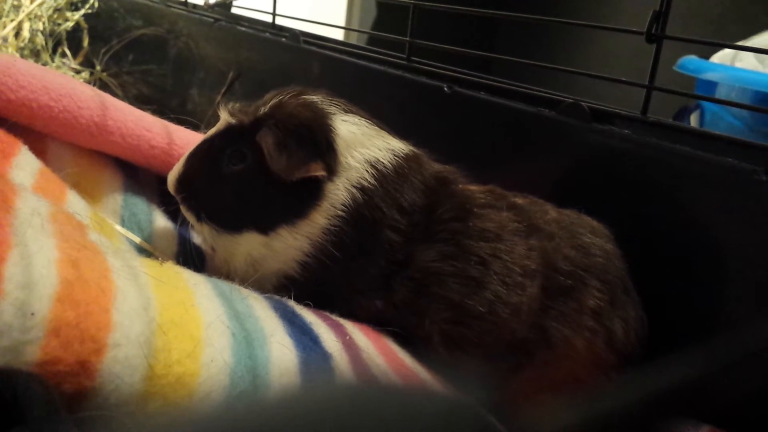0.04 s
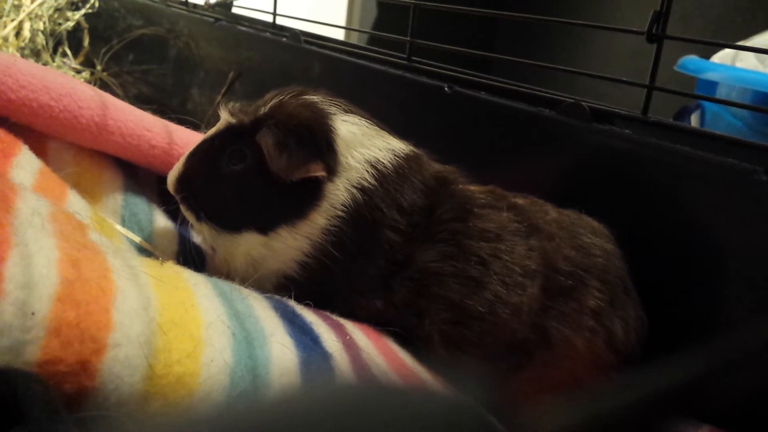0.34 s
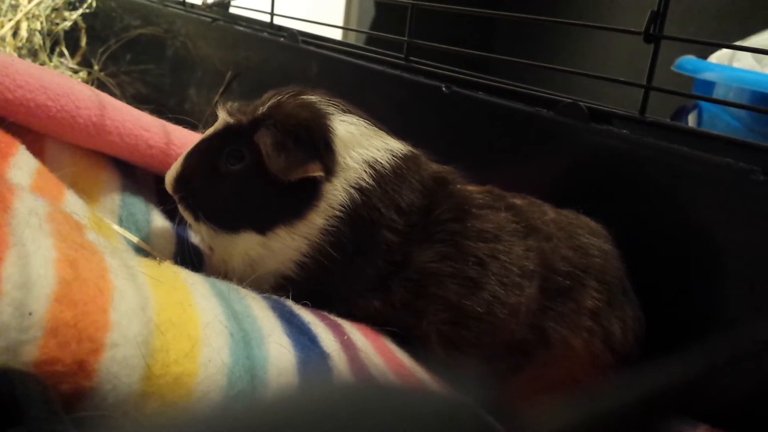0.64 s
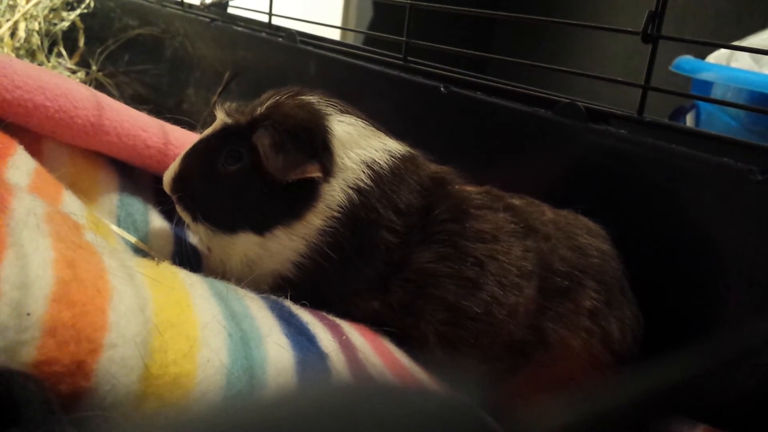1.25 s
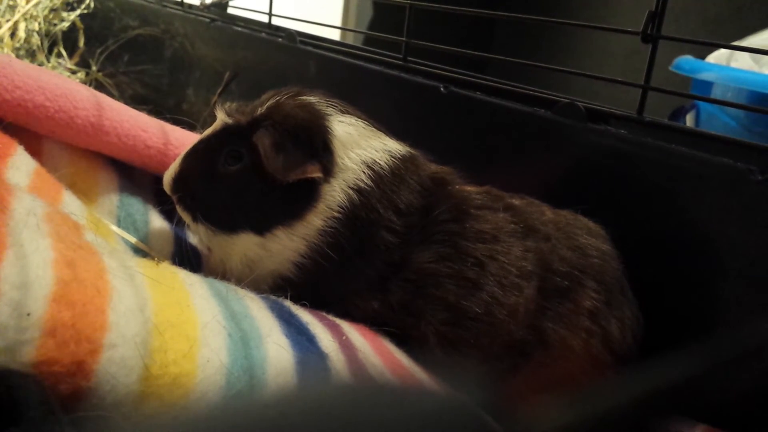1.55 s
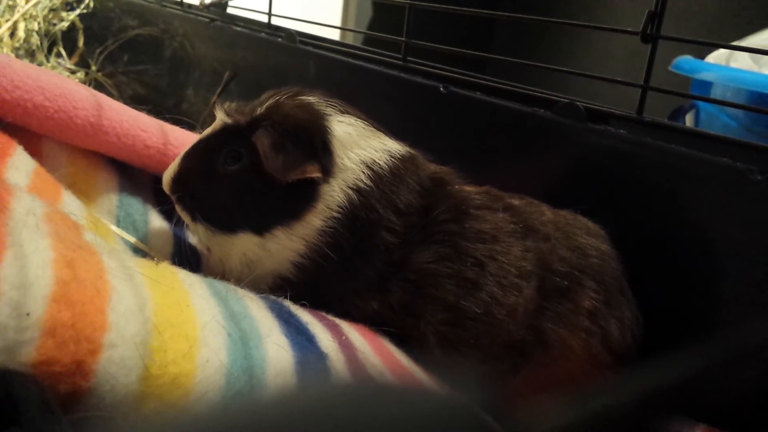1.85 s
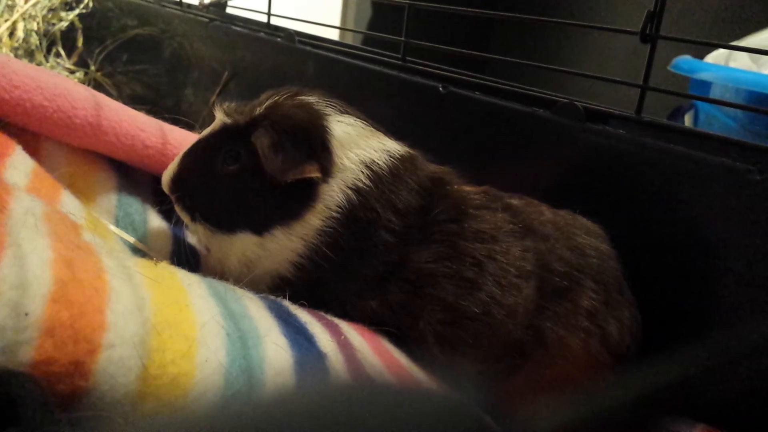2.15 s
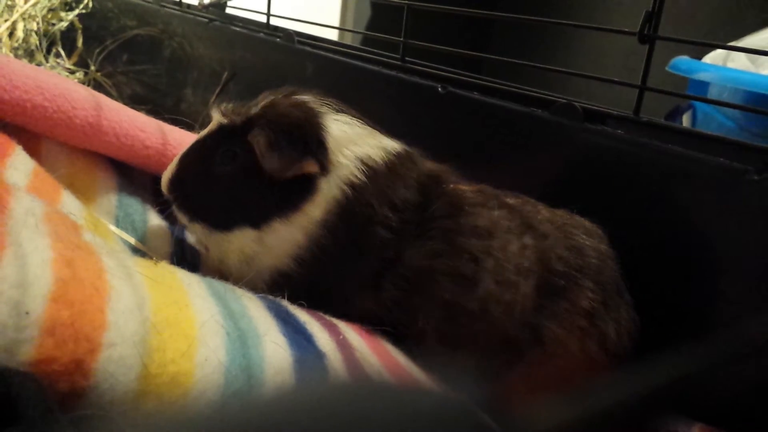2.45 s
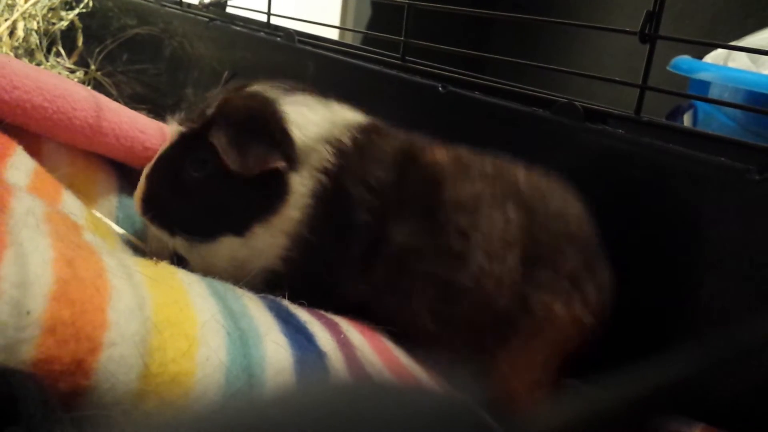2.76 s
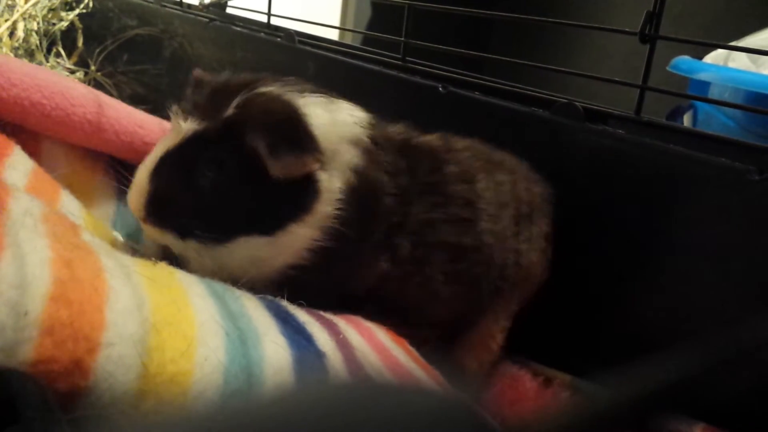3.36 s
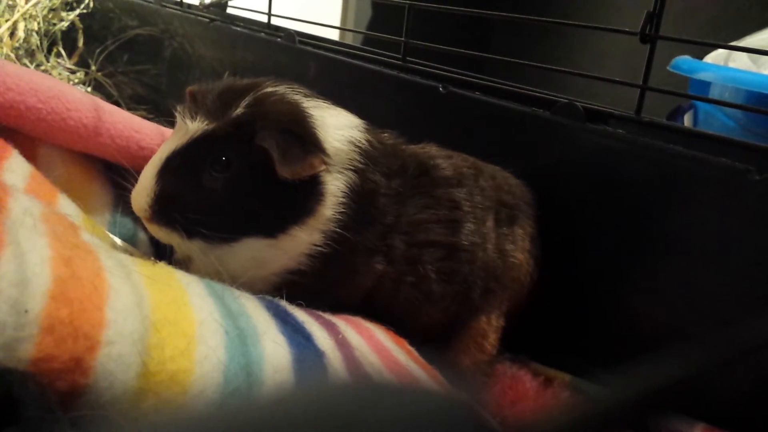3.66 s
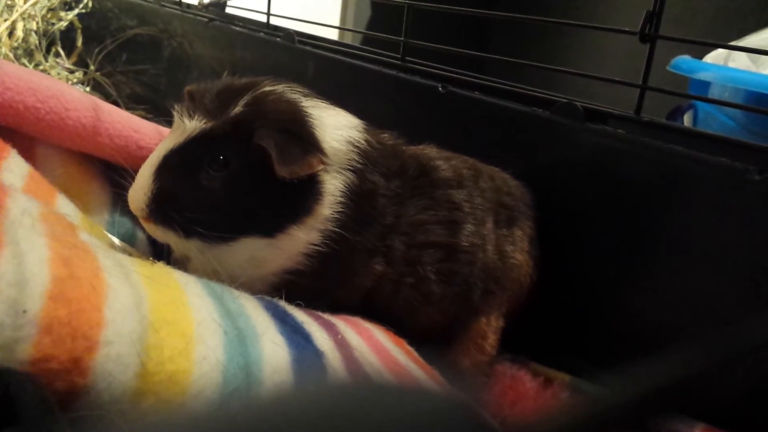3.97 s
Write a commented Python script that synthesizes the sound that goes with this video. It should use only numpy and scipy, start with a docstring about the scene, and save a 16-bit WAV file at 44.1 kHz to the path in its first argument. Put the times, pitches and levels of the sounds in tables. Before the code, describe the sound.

A guinea pig squeaks and chirps, hopping with soft thumps in its cage.

```python
"""Guinea pig in its cage

Close on a cage in a quiet room, a faint hum behind. A guinea pig noses softly in its bedding, gives
one falling squeak that breaks up hoarsely, then hops forward twice with a short chirp. Its feet thump
the plastic tray while fleece and hay rustle and tick. The stereo mic's right port rings in the treble."""
import sys
import numpy as np
from scipy import signal
from scipy.fft import rfft, irfft, next_fast_len
from scipy.io import wavfile
from scipy.ndimage import map_coordinates

SR = 44100
rng = np.random.default_rng(int(sys.argv[2]) if len(sys.argv) > 2 else 0)


def wav_out(sig):
    """Save sig, one row per channel (or a flat mono array), as 16-bit PCM at SR to the path in sys.argv[1]."""
    wavfile.write(sys.argv[1], SR, np.round(np.clip(np.atleast_2d(sig).T, -1, 1) * 32767).astype(np.int16))


N = 176400
T = np.arange(N) / SR

# soft rustle of bedding, also the rasp in the voice: freq_hz, density_db
RUSTLE_COLOUR = [(200, -21), (700, -18), (1500, 11.5), (2300, -5), (3200, 3), (4200, 4), (5600, 3.5),
                 (7000, -3), (9300, -3), (12000, -7), (15000, -18)]
# dry hay snapping: freq_hz, density_db
SNAP_COLOUR = [(300, -17), (1500, -9), (3500, -3), (5000, 2), (7000, -2), (10000, -4), (15000, -8)]


def voice(call):
    """A near-pure whistle with flickering overtones; hoarseness shakes pitch and level and adds rasp."""
    # overtones through the throat, against the fundamental: freq_hz, gain_db
    throat = [(2200, -23), (3000, -16), (4300, -37), (5800, -33), (7200, -36), (8700, -39), (12000, -49),
              (15000, -65)]
    # lift of the overtones through the call: time_s, gain_db
    brightness = [(2.505, 6.5), (2.526, 10), (2.562, 0.5), (2.585, -3), (2.62, 3), (2.67, 0.5)]
    # hoarseness of the voice: time_s, roughness (0 clear, 1 and over fully hoarse)
    hoarseness = [(2.588, 0.05), (2.604, 1.11), (2.618, 0.14), (2.665, 0.4), (3.135, 0.18)]
    jitter, shimmer, rough_hz, edge_s = 0.12, 0.77, 900, 0.0064
    pitch_hz, level_db = curves(call)
    bright_db = curves(brightness)[0]
    rough = np.clip(curves(hoarseness)[0], 0, 1)
    gate = np.clip(np.minimum(T - call[0][0], call[-1][0] - T) / edge_s + .5, 0, 1)
    phase = 2 * np.pi * np.cumsum(pitch_hz * (1 + jitter * rough * wobble(rough_hz))) / SR
    tone = np.sin(phase)
    for k in range(2, 9):
        overtone_db = along(throat, k * pitch_hz) + bright_db + 6.5 * wobble(90)
        phase_blur = k * 0.15 * wobble(780)
        tone += amp(overtone_db) * np.sin(k * phase + phase_blur)
    hiss = noise(RUSTLE_COLOUR) * (1 + np.cos(phase))  # pulses once a cycle
    rasp = (amp(-28.5) + amp(-30) * rough) * hiss
    tone *= 1 + shimmer * rough * wobble(rough_hz)
    return np.sqrt(2) * gate * amp(level_db) * (tone + rasp) * pan(1)


def paws():
    """Each footfall is a damped thump with a brief slap, and sets the plastic tray ringing."""
    # paws landing, slap relative to thump: start_s, level_db, pitch_hz, pan_db, slap_db
    steps = [(.567, -55.5, 485, 14, -4), (0.681, -50.5, 280, 13, -15), (2.084, -53.5, 340, 13, -12),
             (2.321, -43, 425, 16, -17), (2.556, -41, 640, 4, -19), (2.733, -51, 305, 7, -11),
             (2.834, -26, 146, -8, -12.5), (2.8639, -23, 350, 4.5, -3), (2.888, -40, 190, -1, -20),
             (3.2068, -26, 317, -3, -30), (3.215, -29.5, 159, -4, -30), (3.2637, -9.5, 498, -2.5, -14),
             (3.268, -25.5, 193, -9, -11), (3.2726, -25, 510, 11, -4), (3.276, -21, 135, -5, -36.5),
             (3.318, -37, 159, -20.5, -20), (3.388, -28, 310, -7, -27)]
    # modes of the tray: freq_hz, level_db, t60_s
    tray_modes = [(84, -7, .3), (107, -2, 0.29), (186, -1, 0.18), (346.2, -2, 0.4), (470, -21, .25),
                  (553, -0.5, 0.15), (800, 3, 0.12), (990, 4, 0.16), (1235, -9.5, 0.22), (1531, 4.5, 0.69),
                  (1910, 3, 0.87)]
    thump_cycles, slap_s, tray_db = 0.63, 0.0011, -52
    t = np.arange(SR // 2) / SR
    impacts = np.zeros((2, N + SR))
    lowpass = signal.butter(2, 1680, fs=SR, output="sos")
    for start_s, db, hz, pan_db, slap_db in steps:
        age = t * hz / thump_cycles
        thump = -2 * np.sqrt(age) * np.exp(-age) * np.sin(2 * np.pi * hz * t)
        slap = unit(signal.sosfilt(lowpass, rng.standard_normal(len(t)))) * np.exp(-t / slap_s)
        at = round(start_s * SR)
        impacts[:, at:at + len(t)] += amp(db) * pan(pan_db) * (thump + amp(slap_db) * slap)
    ring = 0
    for hz, db, t60 in tray_modes:
        port_phases = 0.68 * rng.standard_normal((2, 1))
        ring += amp(db - 60 * t / t60) * np.cos(2 * np.pi * hz * t + port_phases)
    return impacts[:, :N] + amp(tray_db) * convolved(impacts, ring)


def body_drag():
    """The body rubs unevenly over the fleece and rumbles in the tray."""
    # weight of the rubbing: time_s, level_db
    rubbing = [(2.44, -120), (2.52, -60), (2.56, -53.5), (2.74, -52), (2.81, -53.5), (2.86, -39.5),
               (2.93, -46), (3.08, -53.5), (3.18, -44), (3.23, -35), (3.3, -35), (3.41, -38), (3.5, -44),
               (3.6, -47), (3.68, -55.5), (3.9, -64.5)]
    # rumble of the padded tray: freq_hz, density_db
    colour = [(25, -25.5), (55, -6.5), (90, 0), (180, -7.5), (250, -5.5), (350, -4.5), (600, -7.5),
              (1000, -12), (1600, -20), (3000, -21), (8000, -49)]
    return amp(curves(rubbing)[0] + 1.51 * wobble(60)) * noise(colour, side_db=-0.5)


def scuffs():
    """Sudden grainy scuffs through fleece and hay; the tug of the fleece rings the cage wires faintly."""
    # scuffs in the bedding: start_s, level_db, decay_s, hay_share (0 all fleece, 1 all dry hay)
    strokes = [(2.604, -54.5, 0.049, 0.14), (2.71, -56, 0.067, 0.96), (2.812, -52.5, 0.015, 0.3),
               (2.831, -53, 0.075, 0.95), (2.942, -46.5, 0.026, .15), (3.1, -59.5, 0.081, .1),
               (3.139, -50, 0.066, 0.14), (3.175, -43.5, .028, .03), (3.214, -40, 0.033, .05),
               (3.239, -39, 0.028, 0.37), (3.268, -35, 0.025, 0.01), (3.326, -41.5, 0.038, 0.2),
               (3.408, -42.5, 0.022, 0), (3.436, -45.5, 0.023, 0.3), (3.55, -56.5, 0.074, 0.94),
               (3.574, -57.5, 0.05, 0.84)]
    # modes of the cage wires: freq_hz, level_db
    wire_modes = [(5580, 0.5), (6235, -1), (7050, -6.5), (7465, 2.5), (7800, 4.5), (9070, 0.5), (10360, -6)]
    rise_s, grain_db, grain_hz = .007, 3, 1500
    wire_t60_s, wire_db = .04, -34
    fleece_power, hay_power = np.zeros((2, N))
    for start_s, db, decay_s, hay_share in strokes:
        age = T - start_s
        envelope = amp(db) * np.clip(age / rise_s, 0, 1) * np.exp(-np.abs(age) / decay_s)
        fleece_power += (1 - hay_share) * envelope ** 2
        hay_power += hay_share * envelope ** 2
    fleece = np.sqrt(fleece_power) * unit(amp(grain_db * wobble(grain_hz)) * noise(RUSTLE_COLOUR))
    hay = np.sqrt(hay_power) * unit(amp(grain_db * wobble(grain_hz)) * noise(SNAP_COLOUR))
    t = T[:SR // 3]
    ring = sum(amp(db - 60 * t / wire_t60_s) * np.cos(2 * np.pi * hz * t) for hz, db in wire_modes)
    return fleece + hay + amp(wire_db) * convolved(fleece, ring[None])


def hay_ticks(decay_s=0.0034):
    """Single stalks snap with a brief, bright crack."""
    # stalks snapping: start_s, level_db
    snaps = [(.277, -62), (.911, -60.5), (1.525, -64), (1.557, -61.5), (1.805, -63.5), (2.06, -60.5),
             (2.19, -60.5), (2.321, -46.5), (2.8291, -37), (3.891, -58.5)]
    envelope = sum(amp(db) * (T >= s) * np.exp(-np.abs(T - s) / decay_s) for s, db in snaps)
    return envelope * noise(SNAP_COLOUR)


def stirs():
    """Gentle swells of fine rustle while the animal sits nosing in the hay."""
    # soft stirring: centre_s, level_db, half_length_s
    swells = [(0, -65, 0.046), (0.142, -68.5, 0.048), (0.377, -67.5, 0.024), (0.684, -68, 0.09),
              (1.053, -67, 0.064), (1.39, -69, .04), (1.56, -77, 0.058), (1.735, -72.5, 0.031),
              (1.875, -72, 0.058), (2.116, -65, 0.09), (2.282, -64.5, 0.028), (2.348, -63, 0.035)]
    # stirred hay: freq_hz, density_db
    colour = [(40, 8), (110, 14), (300, 5.5), (700, 7.5), (2000, -1), (3200, 1.5), (5000, 0.5), (7000, 0.5),
              (10000, -6.5), (15000, -9)]
    power = sum(amp(db) ** 2 * np.exp(-((T - s) / half_s) ** 2) for s, db, half_s in swells)
    return np.sqrt(power) * noise(colour)


def room_tone():
    """Faint air noise and a hum that wavers in level and phase."""
    # still air: freq_hz, density_db
    air_colour = [(20, -3), (50, -0.5), (100, 1), (170, 1), (300, -5), (550, -5), (1000, -11),
                  (2000, -14.5), (4000, -15), (7000, -21), (15000, -21)]
    # tones of the hum: freq_hz, level_db
    hum_tones = [(102, -74), (301, -77), (544, -87.5)]
    hum = sum(amp(db + 1.5 * wobble(5.96)) * np.sin(2 * np.pi * hz * T + 0.81 * wobble(6.5))
              for hz, db in hum_tones)
    return amp(-66.5) * noise(air_colour, side_db=-3) + np.sqrt(2) * hum


def off_walls(x):
    """The cage walls add six weak early echoes at each microphone port."""
    lags_s = rng.uniform(0.00193, .012, (2, 6, 1))
    return x + amp(-9.5) * filtered(x, lambda hz: np.exp(-2j * np.pi * hz * lags_s).sum(axis=1))


def in_room(x, wet_db):
    """The sound plus a diffuse tail in which each frequency dies at its own speed."""
    # decay of the room: freq_hz, t60_s
    decay_times = [(100, 0.52), (500, 0.32), (2000, 1), (7000, 0.63), (14000, 0.43)]
    hz, t, spectra = signal.stft(rng.standard_normal((2, SR)), SR, nperseg=256)
    decay = amp(-60 * t / along(decay_times, hz)[:, None])
    tail = signal.istft(spectra * decay, SR, nperseg=256)[1]
    return x + amp(wet_db) * convolved(x, tail / np.linalg.norm(tail[0]))


def amp(db):
    """Decibels to gain."""
    return 10 ** (np.asarray(db) / 20)


def unit(x):
    """Scale to rms 1."""
    return x / np.sqrt(np.mean(x ** 2) + 1e-20)


def pan(db):
    """Left and right gains, the left louder by db."""
    return amp([[db / 2], [-db / 2]])


def along(points, hz):
    """Read (freq_hz, value) points on a log frequency axis."""
    freqs, values = np.transpose(points)
    return np.interp(np.log(hz + 1), np.log(freqs + 1), values)


def curves(rows):
    """One value per sample for each column after the time."""
    times, *columns = np.transpose(rows)
    return [np.interp(T, times, column) for column in columns]


def wobble(rate_hz):
    """A smooth random curve with rate_hz knots a second."""
    return map_coordinates(rng.standard_normal(N // 4), [T * rate_hz], mode="wrap")


def filtered(x, gain):
    """x times a gain that depends on frequency."""
    size = next_fast_len(N + 8192)
    return irfft(rfft(x, size) * gain(np.fft.rfftfreq(size, 1 / SR)), size)[..., :N]


def convolved(x, response):
    """Stereo x through an impulse response, cut to N samples."""
    return signal.fftconvolve(x, response, axes=1)[:, :N]


def noise(colour, side_db=1):
    """Coloured stereo noise of rms 1; side_db sets its width."""
    mid, side = filtered(rng.standard_normal((2, N)), lambda hz: amp(along(colour, hz)))
    return unit(np.array([mid + amp(side_db) * side, mid - amp(side_db) * side]))


def scene():
    """Voice, feet and bedding as they reach the microphone through the room."""
    # the falling squeak: time_s, pitch_hz, level_db
    squeak = [(2.501, 1310, -52.5), (2.514, 1596, -42.5), (2.532, 1385, -40.5), (2.541, 1412, -40.5),
              (2.547, 1462, -39.5), (2.565, 1449, -37), (2.578, 1536, -36), (2.588, 1393, -37.5),
              (2.604, 1203, -42.5), (2.616, 1063, -40.5), (2.638, 1097, -44), (2.65, 1145, -45.5),
              (2.668, 1085, -43)]
    # the chirp between the hops: time_s, pitch_hz, level_db
    chirp = [(3.132, 1430, -45.5), (3.141, 1360, -46), (3.15, 1130, -43)]
    calls = off_walls(voice(squeak) + voice(chirp))
    return (in_room(calls, wet_db=-14) + in_room(paws(), wet_db=-11)
            + in_room(scuffs(), wet_db=-6) + in_room(hay_ticks(), wet_db=-3.5)
            + stirs() + body_drag() + room_tone())


def record(dry):
    """A stereo microphone whose right port peaks near 7 kHz; deep bass and the very top are cut."""
    # response of the right port: freq_hz, gain_db
    right_port = [(200, 0), (600, -2), (2000, -1.5), (4200, -0.5), (5600, 5.5), (6400, 10), (7050, 15),
                  (7800, 11), (8500, 8), (11000, 6.5), (14500, 6)]
    low_cut_hz, top_hz = 56, 14700
    ports = np.array([dry[0], filtered(dry[1], lambda hz: amp(along(right_port, hz)))])
    return filtered(ports, lambda hz: (hz < top_hz) * hz ** 2 / np.hypot(hz ** 2, low_cut_hz ** 2))


dry = scene()
out = record(dry)
wav_out(out)
```